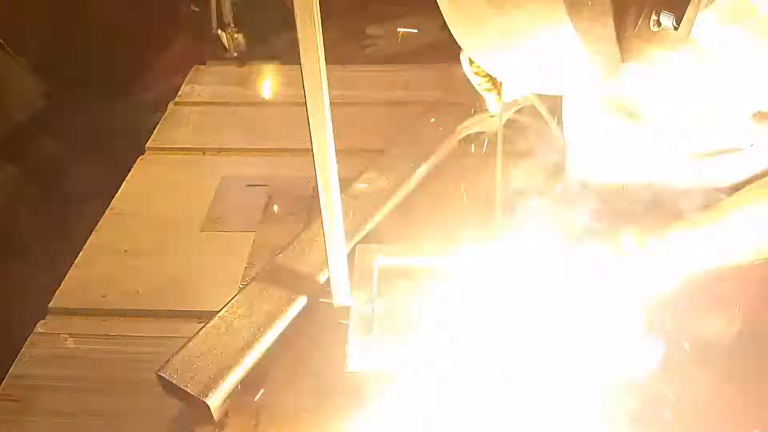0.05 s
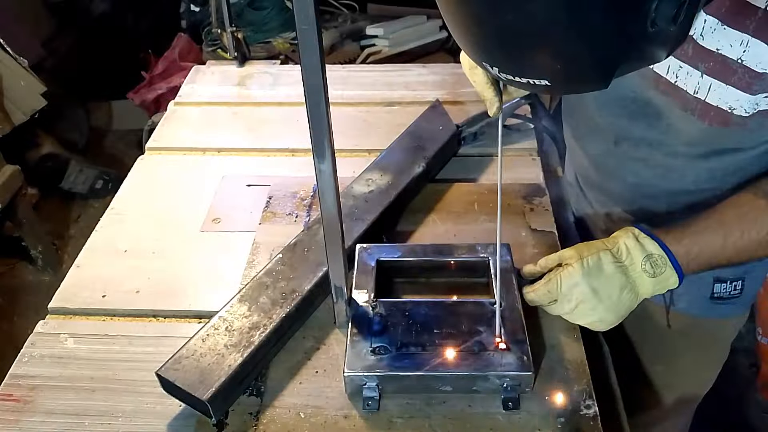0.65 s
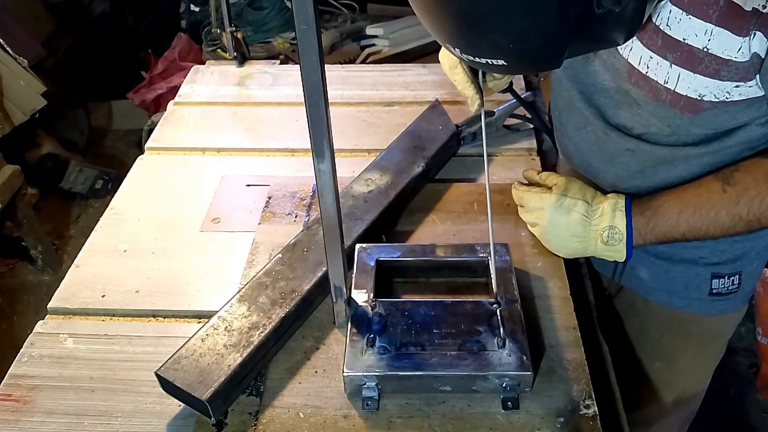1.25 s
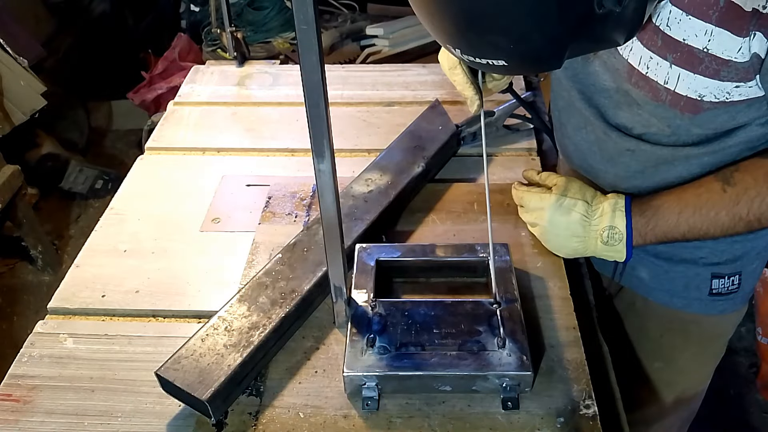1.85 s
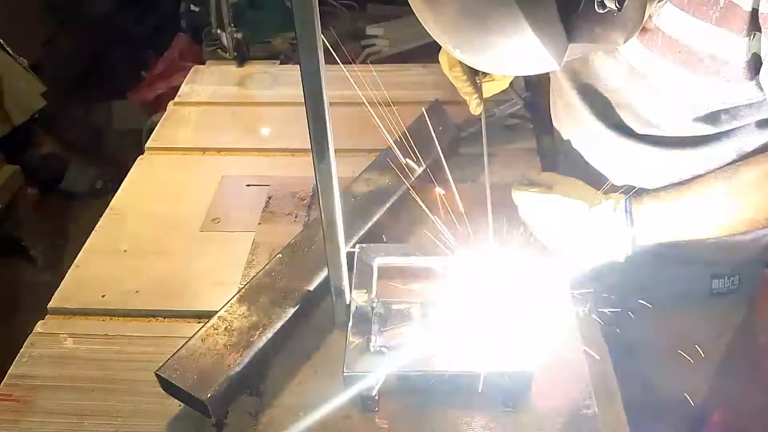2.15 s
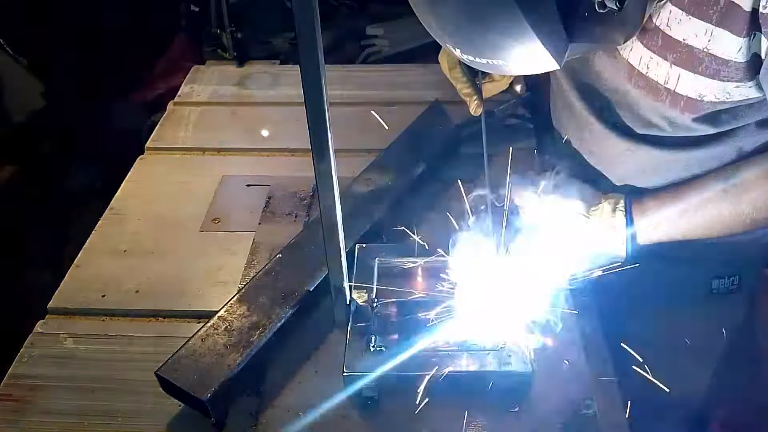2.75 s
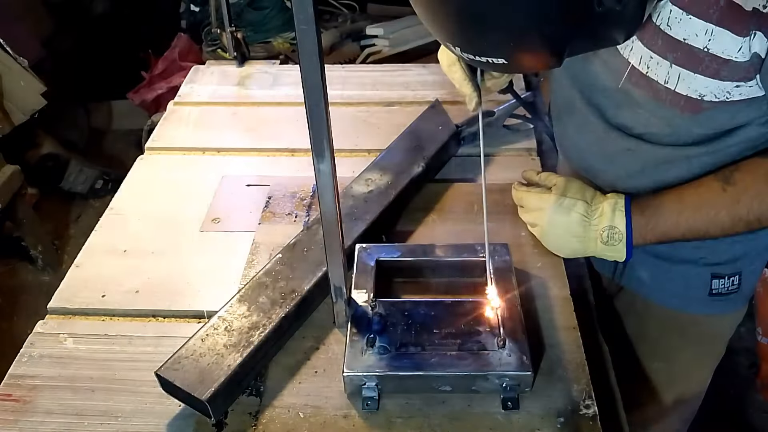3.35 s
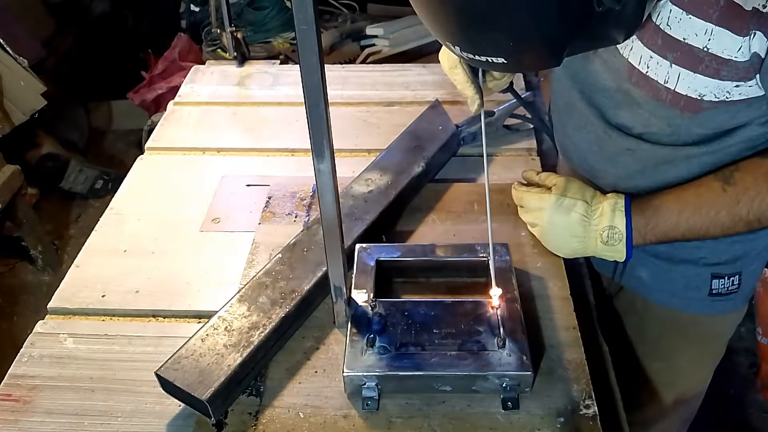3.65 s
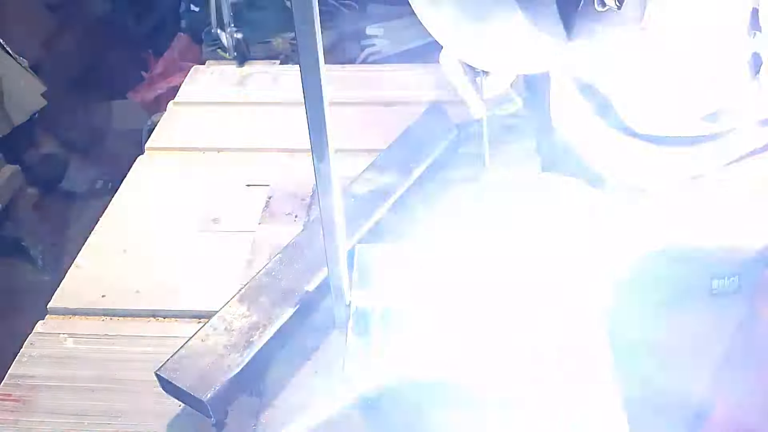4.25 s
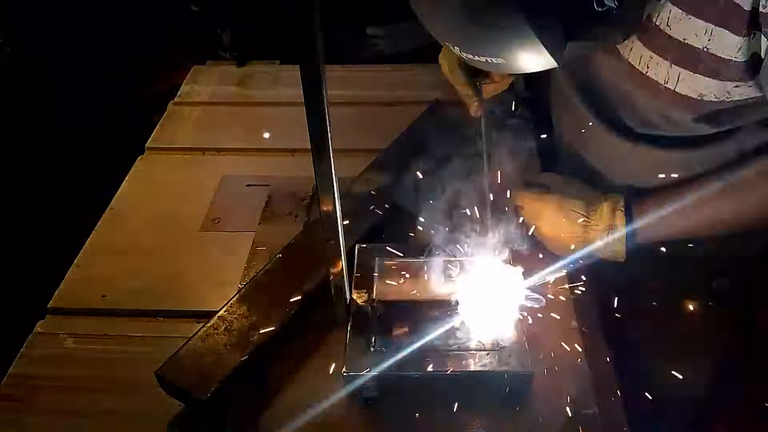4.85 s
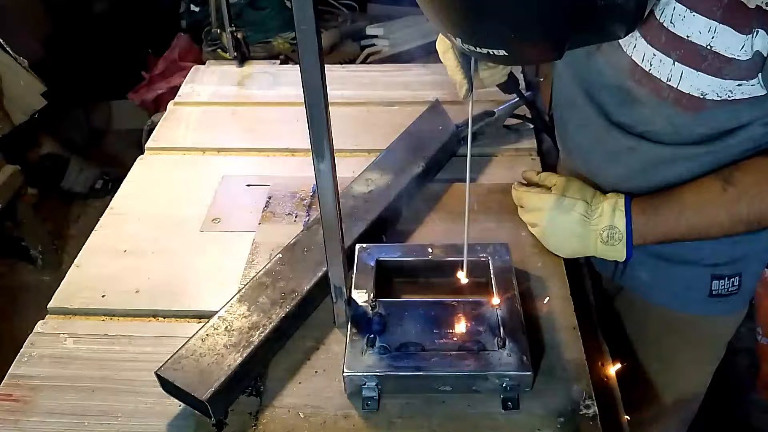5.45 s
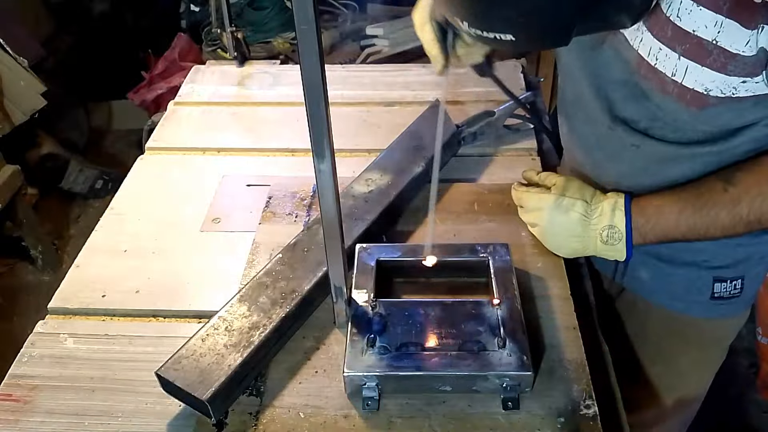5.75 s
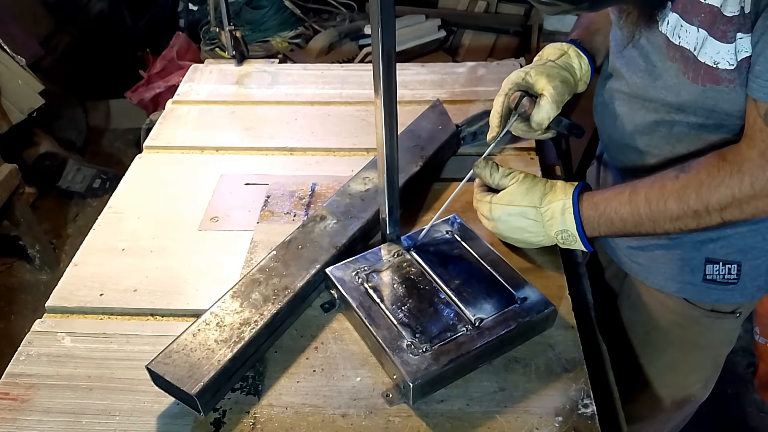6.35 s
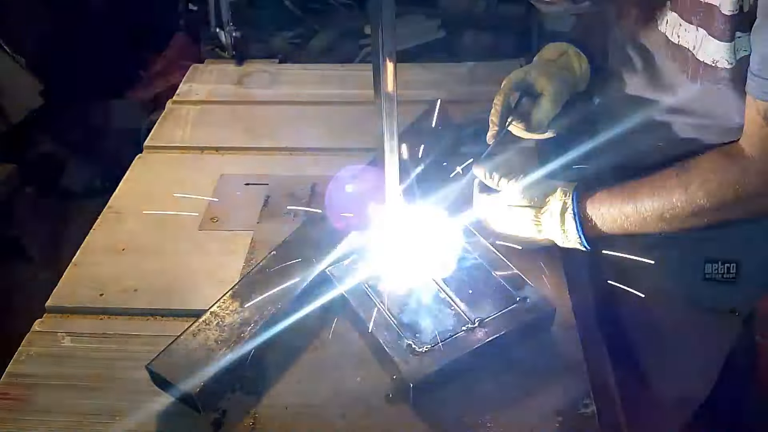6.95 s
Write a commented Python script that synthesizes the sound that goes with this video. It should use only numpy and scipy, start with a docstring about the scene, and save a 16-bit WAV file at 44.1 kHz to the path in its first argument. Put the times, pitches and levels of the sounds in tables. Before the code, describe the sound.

A welding arc sizzles and sputters in four brief tacks, with the machine whining and its fan humming between them.

```python
"""Stick welding: four short tacks on a steel box on a workbench.
The arc fries with tiny sparks and pops as metal drops short it; the electrode coating flares in puffs.
Box, bench and workshop answer. Cooling slag pings after the second tack.
Behind it all the welder whines, louder under load, and its fan hums and rushes."""
import sys
import numpy as np
from scipy import signal
from scipy.fft import rfft, irfft, next_fast_len
from scipy.io import wavfile
from scipy.ndimage import map_coordinates

SR = 44100
rng = np.random.default_rng(int(sys.argv[2]) if len(sys.argv) > 2 else 0)


def bounce(signal):
    """Save signal as a 16-bit WAV file at the path given by the first command-line argument."""
    frames = np.transpose(np.atleast_2d(signal))
    limited = np.clip(frames, -1, 1)
    pcm = np.round(limited * 32767).astype(np.int16)
    wavfile.write(sys.argv[1], SR, pcm)


N = 317520

# Fan air spectrum. Each row: frequency in Hz, relative density in dB.
FAN_AIR = [(30, -4.5), (140, -33.5), (220, -5.5), (340, -10), (460, 1), (540, -14.5), (750, -8),
           (1050, -15.5), (2000, -14), (2700, -16.5), (3400, -16.5), (4500, -16.5), (8000, -22.5),
           (11500, -34), (15500, -36.5)]
# Fan and housing hum. Each row: frequency in Hz, rms level in dB.
FAN_HUM = [(344.5, -71.5), (457.6, -72), (484, -75.5), (775, -76.5), (1165, -77.5), (1545, -81.5)]
# Whine overtones. Each row: harmonic number, idle rms level in dB.
WHINE_HARMONICS = [(1, -75.5), (2, -76.5), (4, -68.5), (5, -86.5), (6, -73.5), (7, -79.5), (8, -79),
                   (11, -91.5)]
# Shrill spells of harmonic 8. Each row: start in seconds, end in seconds, rms level in dB.
WHINE_SHRILLS = [(.33, 0.673, -72), (3.265, 3.56, -73)]
# Workshop decay. Each row: frequency in Hz, T60 in seconds.
SHOP_DECAY = [(200, 0.62), (1000, 0.5), (4000, 0.48), (8000, 0.28), (15000, 0.31)]
# Bounces off box and bench. Each row: delay in seconds, pressure gain.
BOUNCES = [(.00025, 0.31), (.00082, .17), (.00105, 0.26), (.00178, 0.22), (.00355, 0.22), (.0041, 0.071)]
# Slag cracks. Each row: start in seconds, relative level in dB.
SLAG_PINGS = [(3.305, -45.5), (3.389, -47), (3.69, -64), (3.79, -63)]
# Steel under the slag. Each row: frequency in Hz, relative level in dB, T60 in seconds.
STEEL_MODES = [(6800, -2, 0.16), (6450, -3, 0.32), (7120, -3, .17), (9500, -8.5, 0.15), (10100, -9, 0.18),
               (10480, -10.5, .13), (12330, -8, 0.14)]
# Coating gas blasts. Each row: start in seconds, relative push in dB, relative puff in dB.
GAS_BLASTS = [(2.1109, -6, -31), (2.1363, -3, -58), (2.1729, -1.5, -55), (2.7422, -22, -43.5),
              (6.746, -35.5, -26.5)]
# Box resonances. Each row: frequency in Hz, bandwidth in Hz, gain in dB.
BOX_MODES = [(602, 58, -2), (3894, 150, -8.5), (6550, 420, -6), (8100, 330, -6), (8800, 160, -8.5),
             (12900, 300, -2), (14900, 350, 2.5)]
# Arc spectrum at each tack's spot. Each row: frequency in Hz, relative density in dB.
SPOT_1_SPECTRUM = [(120, -32), (200, -9.5), (506, -6), (575, -2.5), (798, -12.5), (1030, -2.5), (1510, -6),
                   (2020, -10), (2130, -12.5), (3120, 0.5), (5010, -2.5), (6470, 3), (14200, -10.5),
                   (15500, -6)]
SPOT_2_SPECTRUM = [(120, -46), (200, -21.5), (310, -12), (506, -19), (596, -10), (728, -18.5), (1430, -5.5),
                   (1810, -15.5), (1980, -5), (2130, -12), (2750, -4.5), (3300, -6), (7760, 2.5),
                   (15500, -8.5)]
SPOT_3_SPECTRUM = [(120, -47.5), (200, -25), (515, -24), (585, -16), (974, -28.5), (1130, -15), (1400, -6),
                   (1810, -20), (3010, -4), (3550, -12.5), (3890, -6), (4840, -7.5), (6710, -0.5),
                   (15500, -15)]
SPOT_4_SPECTRUM = [(120, -64), (200, -36.5), (339, -12), (515, -18.5), (618, -15), (940, -12), (1070, -22),
                   (1150, -16.5), (1450, -15), (1810, -5), (2600, -5), (4920, -7), (8350, 0), (15500, -11)]
# Big drops shorting the arc. Each row: time in seconds, relative level in dB, body gain in dB.
BIG_DROPS = [(0.0257, -8, -4.5), (.095, -3.5, -22), (0.1352, -1, -12), (.202, -10.5, 13.5),
             (0.2327, -4, 11.5), (2.0612, -12.5, 17.5), (2.072, -5.5, 6), (2.0915, 0, -5), (2.1125, 3, 8.5),
             (2.1637, 9.5, 4.5), (2.1935, 8.5, 3), (2.2236, 3.5, -1.5), (2.2864, 3, 1), (2.3307, 6, 1),
             (2.391, 5.5, 5), (2.432, 0.5, -10.5), (2.495, 6.5, 3), (2.5366, 6.5, -1), (2.5616, -1.5, 13.5),
             (2.5813, 1, 11.5), (2.642, 2.5, 3), (2.6963, 2.5, -4), (2.7425, 8, 11), (2.8069, 5, -6.5),
             (2.8287, 7, 0.5), (2.8794, 6, 1), (2.9158, 5.5, 3.5), (2.9643, 7, 2.5), (2.9792, 5, -9),
             (3.0097, 2.5, 6), (3.0498, 2.5, -15), (3.0602, -0.5, 3.5), (3.0994, 0, 9), (3.173, -14, 8),
             (4.2468, -9.5, 10.5), (4.2769, 1, 3), (4.3556, 5, -13), (4.4763, 0.5, -13.5),
             (4.546, 5.5, -14), (4.5613, 3, 7), (4.651, 6.5, 0.5), (4.733, 9, 2), (4.7759, -.5, 4),
             (4.7898, 4.5, -8.5), (4.8551, 6, -5), (4.9126, 1, -5.5), (4.9301, 1.5, 0), (4.949, 0.5, 2.5),
             (5.051, 3.5, 1.5), (5.0611, 1, 3), (5.152, 0.5, 0), (5.1892, -15.5, 19.5), (6.7475, -4.5, 19),
             (6.8813, -3, -15), (6.9127, 6, -10.5), (6.923, 5.5, 2), (6.9549, 5.5, -1.5),
             (7.0344, 1.5, -0.5), (7.0594, 3, 6.5), (7.1149, -4, -13)]
# Arc surges and near stalls. Each row: centre in seconds, half width in seconds, sizzle change in dB.
ARC_SURGES = [(0.001, 0.019, 14), (0.059, 0.037, 1), (0.113, 0.03, 9), (2.145, 0.033, 15.5),
              (2.47, .02, -4.5), (3.07, 0.026, 3.5), (4.337, 0.031, -27.5), (5.174, 0.01, 9)]
# Tacks. Each row: strike in seconds, break in seconds, relative sizzle in dB, relative gas in dB,
# whine hold in seconds.
TACK_WELDS = [(-.03, 0.26, -36, -42, 0.34), (2.059, 3.183, -31.5, -34, 0.27),
              (4.249, 5.248, -34, -35.5, 0.66), (6.75, 7.295, -35.5, -36.5, 0.1)]

ARC_RISE_S, ARC_FADE_S = 0.03, 0.06
TIME_S = np.arange(N) / SR


def amp(db):
    """Decibels to gain."""
    return 10 ** (np.asarray(db) / 20)


def unit(x):
    """Scale to rms 1."""
    return x / np.sqrt(np.mean(x ** 2) + 1e-20)


def along(points, hz):
    """Interpolate (Hz, value) points on a log axis."""
    point_hz, values = np.transpose(points)
    return np.interp(np.log(hz + 1), np.log(point_hz + 1), values)


def gate(start_s, end_s, rise_s, fall_s):
    """Trapezoid, 0 to 1, between two times."""
    return np.clip(np.minimum((TIME_S - start_s) / rise_s, (end_s - TIME_S) / fall_s), 0, 1)


def wobble(knots_per_s, steps=8):
    """Smooth random curve."""
    knots = rng.standard_normal(int(N * knots_per_s / SR) + 4)
    fine = map_coordinates(knots, [np.arange(steps * (len(knots) - 1)) / steps])
    return np.interp(np.arange(N) * (steps * knots_per_s / SR), np.arange(len(fine)), fine)


def through(x, response):
    """Convolve, cut to N samples."""
    return signal.fftconvolve(x, response)[:N]


def band(x, hz, kind, order=2):
    """Causal Butterworth filter."""
    return signal.sosfilt(signal.butter(order, hz, kind, fs=SR, output="sos"), x)


def colour(spectrum, size=4096):
    """Minimum-phase impulse response, energy 1."""
    gain = amp(along(spectrum, np.fft.rfftfreq(size, 1 / SR)))
    cepstrum = irfft(np.log(gain + 1e-6))
    cepstrum[1:size // 2] *= 2
    cepstrum[size // 2 + 1:] = 0
    response = irfft(np.exp(rfft(cepstrum)))
    return response / np.linalg.norm(response)


def tail(decay, size=256):
    """Diffuse echo, energy 1, T60 set by frequency."""
    hz, t, noise = signal.stft(rng.standard_normal(SR // 2), SR, nperseg=size)
    fade = amp(-60 * t / along(decay, hz)[:, None])
    echo = signal.istft(noise * fade, SR, nperseg=size)[1]
    return echo / np.linalg.norm(echo)


def workshop(x, wander_s, clutter_db, clutter_t60_s, shop_db):
    """Direct sound, scatter off steel parts, room echo, and bounces that shift as the arc roams."""
    clutter = amp(clutter_db) * tail([(1000, clutter_t60_s)])
    out = x + through(x, clutter + amp(shop_db) * tail(SHOP_DECAY))
    for delay_s, gain in BOUNCES:
        lag = np.round((delay_s + wander_s * wobble(25)) * SR).astype(int)
        out += gain * x[np.clip(np.arange(N) - lag, 0, N - 1)]
    return out


def fan():
    """Fan and housing hum; air rushes through."""
    hum = sum(amp(db + 1.2 * wobble(5)) * np.sin(2 * np.pi * hz * TIME_S + 1.34 * wobble(7.4))
              for hz, db in FAN_HUM)
    air = amp(-61.5 + 0.5 * wobble(8.7)) * through(rng.standard_normal(N), colour(FAN_AIR))
    return np.sqrt(2) * hum + air


def whine(base_hz=676.8, idle_db=-59, load_db=8, rise_s=0.08, fall_s=0.29, leap_db=3.5, leap_s=0.077):
    """The welder's whine swells under load, leaps as the arc breaks and lingers. Harmonic 3 leads."""
    step_s, step_hz, step_db = 6.14, 7, -7.5  # late step: higher and softer
    stepped = np.clip((TIME_S - step_s) / 0.025 + 0.5, 0, 1)
    load = np.max([gate(start_s - rise_s / 2, end_s + hold_s + fall_s, rise_s, fall_s)
                   for start_s, end_s, *_, hold_s in TACK_WELDS], axis=0)
    drive_db = load_db * load + step_db * stepped
    kick_db = leap_db * sum((TIME_S > end_s) * np.exp(-np.abs(TIME_S - end_s) / leap_s)
                            for _, end_s, *_ in TACK_WELDS)
    pitch_hz = (base_hz + step_hz * stepped) * (1 + 0.00025 * wobble(10))
    phase = 2 * np.pi * np.cumsum(pitch_hz) / SR
    lead = amp(idle_db + drive_db + kick_db + 0.4 * wobble(9)) * np.sin(3 * phase)
    shrill = sum(amp(db) * gate(start_s, end_s, 0.06, 0.088) for start_s, end_s, db in WHINE_SHRILLS)
    swell_db = 0.25 * drive_db + 2.8 * kick_db
    overtones = sum(amp(db + swell_db + 1.6 * wobble(7)) * np.sin(k * phase) for k, db in WHINE_HARMONICS)
    return np.sqrt(2) * (lead + shrill * np.sin(8 * phase) + overtones)


def slag(crack_t60_s=0.17, rise_s=0.0018):
    """Cooling slag cracks and gives the steel a faint, gritty ring."""
    out, t = np.zeros(N + SR), np.arange(SR // 2) / SR
    attack = 1 - np.exp(-t / rise_s)
    for start_s, db in SLAG_PINGS:
        blur_rad = 0.14 * np.cumsum(rng.standard_normal((len(STEEL_MODES), len(t))), axis=1)
        ring = sum(amp(mode_db - 60 * t / t60_s) * np.sin(2 * np.pi * hz * t + drift)
                   for (hz, mode_db, t60_s), drift in zip(STEEL_MODES, blur_rad))
        crack = 0.7 * amp(-60 * t / crack_t60_s) * band(rng.standard_normal(len(t)), 5500, "high")
        out[round(start_s * SR):][:len(t)] += amp(db - 6.5) * (ring + crack) * attack
    return out[:N]


def gas_blasts(decay_s=0.0004, rise_s=0.00014, bounce_s=0.0018, bounce_gain=0.51, puff_t60_s=0.29):
    """The coating flares: a low push, reflected inverted by the open box, and a puff of gas."""
    t = np.arange(SR // 4) / SR
    push = np.exp(-t / decay_s) * (1 - np.exp(-t / rise_s))
    push *= 1 + 0.28 * rng.standard_normal(len(t))
    kicks, puffs = np.zeros(N), np.zeros(N)
    for start_s, push_db, puff_db in GAS_BLASTS:
        kicks[round(start_s * SR)] += amp(push_db)
        kicks[round((start_s + bounce_s) * SR)] -= bounce_gain * amp(push_db)
        puffs[round(start_s * SR)] = amp(puff_db)
    pushes = 2.9 * band(through(kicks, push), 215, "high", order=1)
    rush = unit(band(band(rng.standard_normal(N), 350, "high"), 2500, "low", order=1))
    return pushes + rush * through(puffs, amp(-60 * t / puff_t60_s))


def sizzle(sparks_per_s, spread_db, flicker_db):
    """Tiny sparks of unequal size, in flickering clumps."""
    fired = rng.random(N) < sparks_per_s / SR
    sizes = amp(spread_db * np.clip(rng.standard_normal(N), -2, 2))
    return unit(fired * sizes * amp(flicker_db * wobble(130)))


def surge_db(time_s):
    """Sizzle offset as the arc surges or nearly stalls."""
    return sum(db * np.exp(-((time_s - centre_s) / half_s) ** 2) for centre_s, half_s, db in ARC_SURGES)


def small_drops(big, start_s, end_s, sizzle_db, strays_per_s=16, spread_db=2, body_db=-2.5):
    """Rows as in BIG_DROPS: one small drop near each big one, plus strays, once the arc has taken hold."""
    near = [(at_s + rng.uniform(-0.006, 0.026), db - 8.5) for at_s, db, _ in big]
    count = int(strays_per_s * (end_s - start_s))
    times_s = rng.uniform(start_s, min(end_s - ARC_FADE_S, N / SR), count)
    strays = [(at_s, sizzle_db + 26) for at_s in times_s]
    drops = [(at_s, db + min(surge_db(at_s), 0) + spread_db * rng.standard_normal(), body_db)
             for at_s, db in near + strays]
    return [drop for drop in drops if drop[0] > start_s + ARC_RISE_S]


def pops(drops, alight, body_hz=2384, neck_db=-19.5, spatter_db=-21, spit_s=0.003, spits=6):
    """Each drop spits as it necks in a burning arc, bursts in one shock, then spatters."""
    shocks, bodies = np.zeros(N + SR), np.zeros(N + SR)
    for at_s, db, body_db in drops:
        before_s, after_s = spit_s * rng.exponential(size=(2, spits))
        at = np.round((at_s + np.r_[0, -before_s, after_s]) * SR).astype(int)
        spits_db = np.repeat([neck_db, spatter_db], spits) + 3 * rng.standard_normal(2 * spits)
        sizes = amp(db + np.r_[0, spits_db])
        sizes[1:spits + 1] *= alight[at[0] - SR // 200]  # arc state 5 ms before the burst
        np.add.at(shocks, at, sizes)
        np.add.at(bodies, at, sizes * (amp(body_db) - 1))
    return (shocks + band(bodies, body_hz, "low", order=1))[:N]


def tack(weld, spectrum, sparks, flutter, rumble, hush_db=-1, hush_s=0.03, flare_db=-40, flare_s=0.022):
    """One burn: the arc shortens and quietens as a big drop grows, then flares. Hot gas follows weakly."""
    start_s, end_s, sizzle_db, gas_db, _ = weld
    big = [drop for drop in BIG_DROPS if start_s - 0.05 <= drop[0] <= end_s]
    flare_power, growth = np.zeros(N), np.zeros(N)
    for at_s, db, _ in big:
        at = round(at_s * SR)
        flare_power[at:] += amp(flare_db + db) ** 2 * np.exp(-TIME_S[:N - at] / flare_s)
        growth[:at] = np.maximum(growth[:at], 1 - (at_s - TIME_S[:at]) / hush_s)
    burn = amp(sizzle_db + surge_db(TIME_S) + hush_db * np.sqrt(growth))
    strength = np.sqrt(burn ** 2 + flare_power) * gate(start_s, end_s, ARC_RISE_S, ARC_FADE_S)
    gas = amp(gas_db) * np.sqrt(strength)
    alight = np.minimum(strength / amp(sizzle_db), 1)
    bursts = pops(big + small_drops(big, start_s, end_s, sizzle_db), alight)
    return through(strength * sparks + gas * flutter + bursts, colour(spectrum)) + gas * rumble


def welding():
    """Four tacks with sparks and gas jet, each coloured by its spot, all ringing the box."""
    sparks = amp(-3.5) * sizzle(sparks_per_s=1700, spread_db=5.5, flicker_db=2)
    flutter = amp(1.5 * wobble(60)) * unit(band(rng.standard_normal(N), [330, 1000], "band"))
    rumble = amp(-25.5 + 4.04 * wobble(27)) * unit(band(rng.standard_normal(N), [60, 170], "band"))
    spectra = SPOT_1_SPECTRUM, SPOT_2_SPECTRUM, SPOT_3_SPECTRUM, SPOT_4_SPECTRUM
    arc = sum(tack(weld, spectrum, sparks, flutter, rumble) for weld, spectrum in zip(TACK_WELDS, spectra))
    ring = sum(amp(db) * band(arc, [hz - width_hz / 2, hz + width_hz / 2], "band", order=1)
               for hz, width_hz, db in BOX_MODES)
    return amp(-1.15) * (arc + ring)


def scene():
    """Welding beside the running machine, mono."""
    blasts = gas_blasts()
    welds = workshop(welding(), wander_s=0.00005, clutter_db=-2.5, clutter_t60_s=0.038, shop_db=-5)
    return (welds + blasts + slag() + whine() + fan())[None]


def record(dry):
    """Sharpest pops soft-clipped, bass thinned, treble above 15.5 kHz removed."""
    top_hz = 15530
    clipped = dry / (1 + np.abs(dry) ** 6) ** (1 / 6)
    size = next_fast_len(N + SR // 2)
    hz = np.fft.rfftfreq(size, 1 / SR)
    bass_cut = amp(along([(60, -7), (120, -3.5), (165, -10.5), (270, -0.5)], hz))
    top_cut = 1 / (1 + (hz / top_hz) ** 160)
    return irfft(rfft(clipped, size) * bass_cut * top_cut, size)[..., :N]


dry = scene()
out = record(dry)
bounce(out)
```